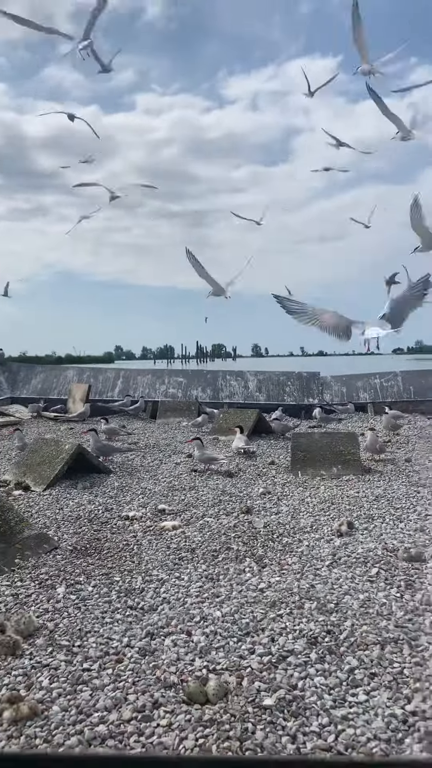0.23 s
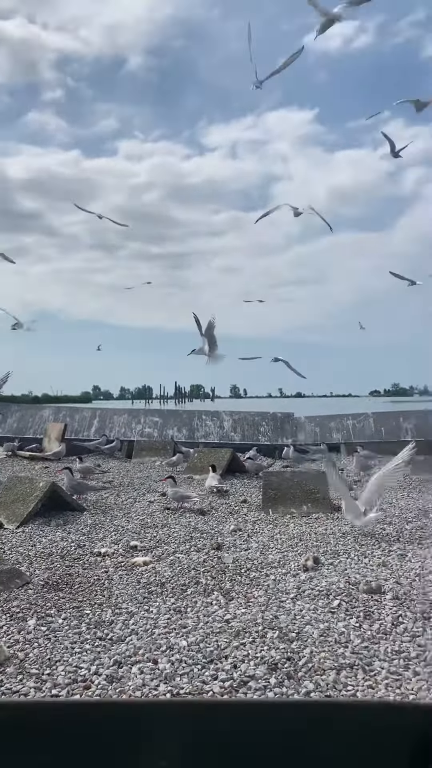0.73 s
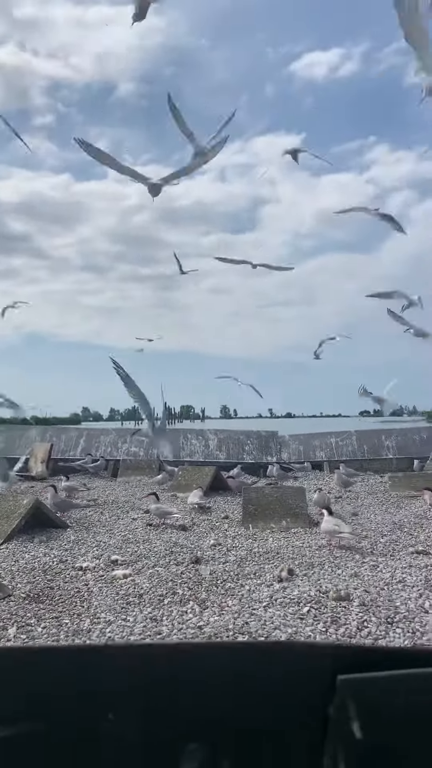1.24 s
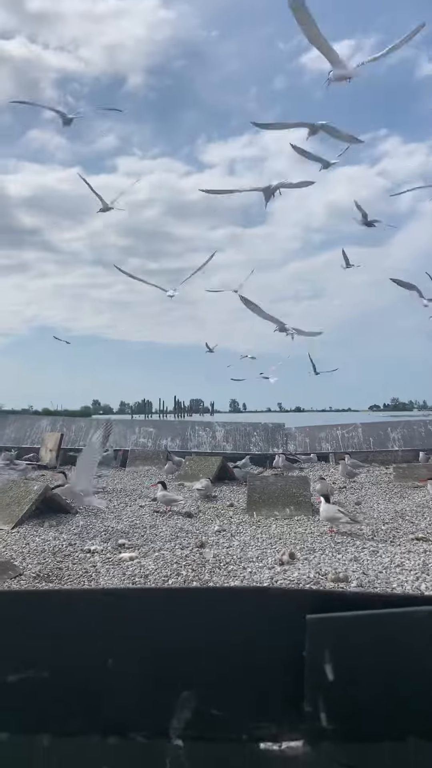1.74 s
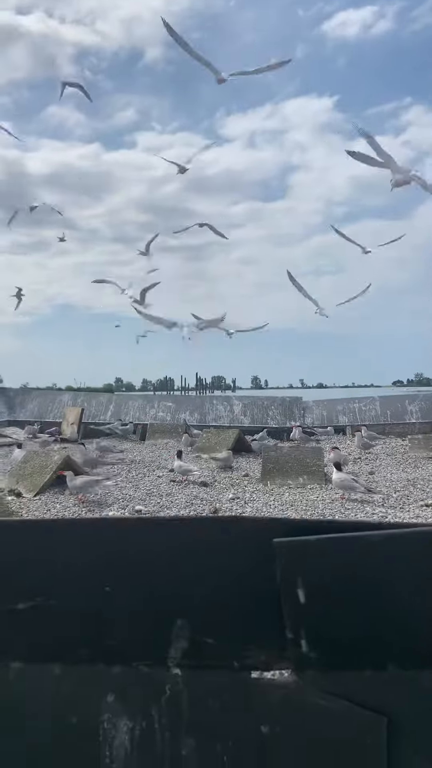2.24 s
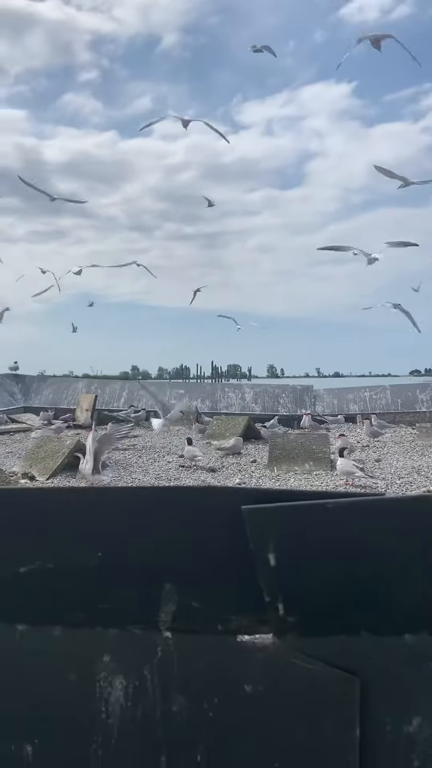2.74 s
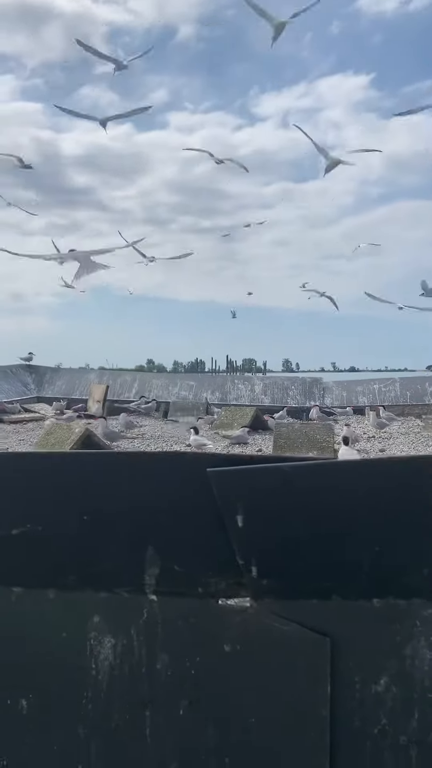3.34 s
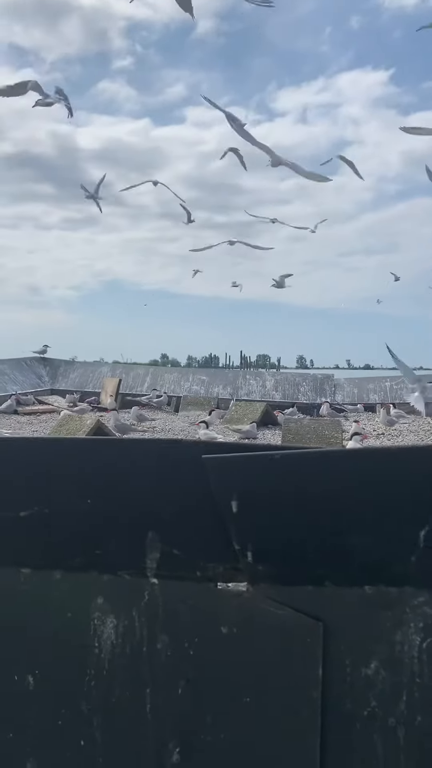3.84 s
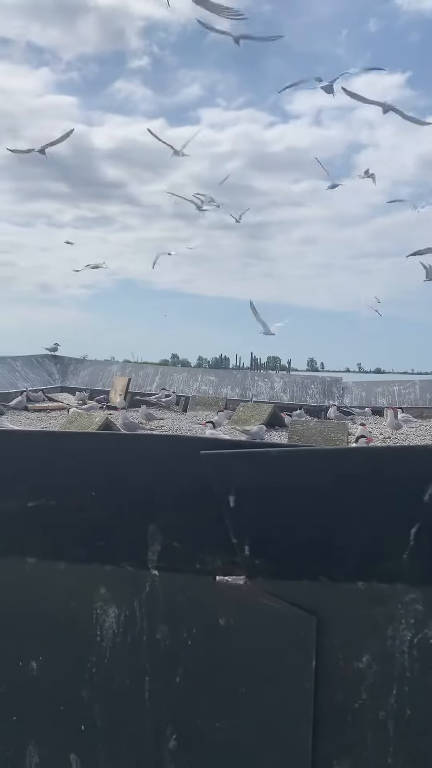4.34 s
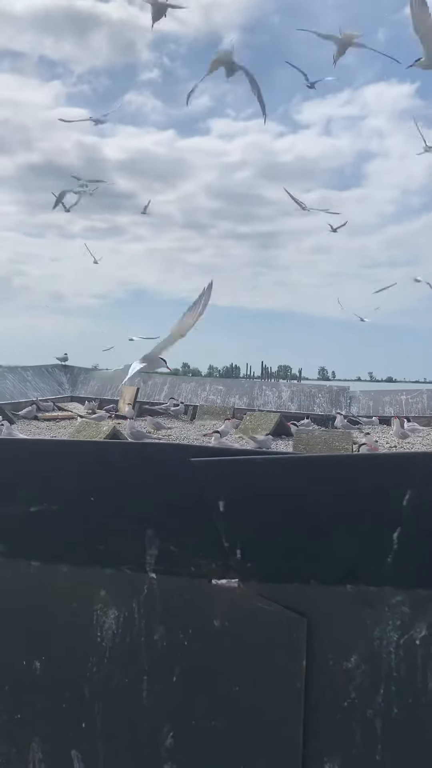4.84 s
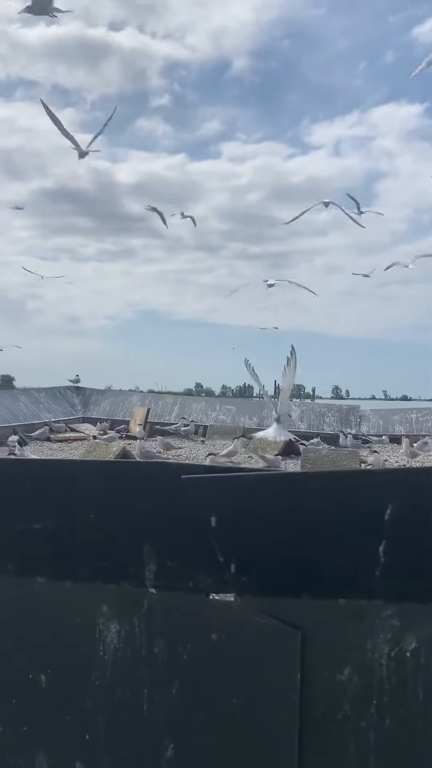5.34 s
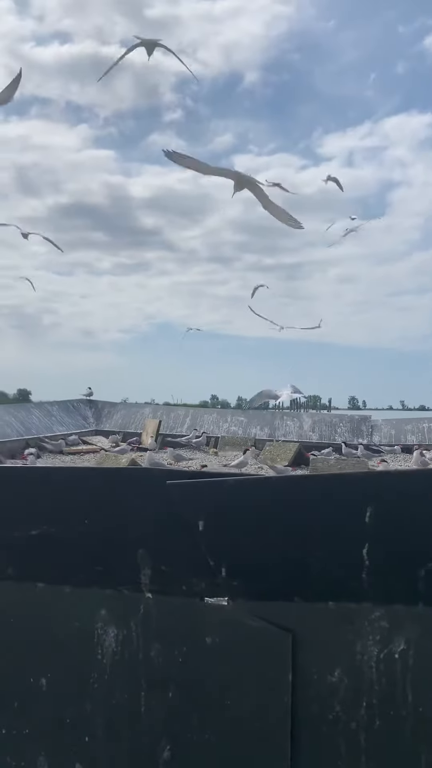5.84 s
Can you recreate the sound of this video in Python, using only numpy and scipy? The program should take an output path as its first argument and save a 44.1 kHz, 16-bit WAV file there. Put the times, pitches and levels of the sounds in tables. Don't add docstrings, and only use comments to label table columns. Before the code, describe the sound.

Outdoors at a gravel nesting island by water, many terns wheel close overhead giving sharp kips, grating screams, falling alarm slurs, hoarse barks and stuttering trills. Hundreds of farther birds merge into a bright, swelling hiss. A handheld phone in the open picks up wide stereo calls and lumpy low wind buffeting, with a hard gust around the middle and more near the end.

```python
import sys
import numpy as np
from scipy import signal
from scipy.fft import rfft, irfft, next_fast_len
from scipy.io import wavfile
from scipy.ndimage import uniform_filter1d, map_coordinates

SR = 44100
rng = np.random.default_rng(int(sys.argv[2]) if len(sys.argv) > 2 else 0)


def voltage_ratio(decibels):
    exponent = np.asarray(decibels, float) / 20
    return 10 ** exponent


def output_pcm(signal):
    pcm = np.clip(np.atleast_2d(signal).T, -1, 1) * 32767
    wavfile.write(sys.argv[1], SR, np.round(pcm).astype(np.int16))


N = 268348


def unit(x):
    return x / np.sqrt(np.mean(x ** 2) + 1e-20)


def along(points, hz):
    f, v = np.transpose(points)
    return np.interp(np.log(hz + 1), np.log(f + 1), v)


def curves(rows):
    s, *cols = np.transpose(rows)
    return [np.interp(np.arange(N) / SR, s, c) for c in cols]


def bumps(rows):
    t = np.arange(N) / SR
    return sum(voltage_ratio(db) * np.exp(-.5 * ((t - s) / width) ** 2) for s, width, db in rows)


def wobble(rate_hz, count=N):
    knots = rng.standard_normal(size=1500)
    return map_coordinates(knots, [np.arange(count) * rate_hz / SR], order=1, mode="mirror")


def arch(length_s, first_hz, middle_hz, last_hz):
    u = np.linspace(0, 1, max(int(length_s * SR), 64))
    return np.polyval(np.polyfit([0, .5, 1], [first_hz, middle_hz, last_hz], 2), u)


def filtered(x, response):
    m = next_fast_len(N + 8192)
    return irfft(rfft(x, m) * response(np.fft.rfftfreq(m, 1 / SR)), m)[..., :N]


def silence():
    return np.zeros((2, N + SR))


def add(out, s, call):
    side_db = rng.normal(0, 0.78) * np.array([[1], [-1]])
    out[:, int(s * SR):][:, :len(call)] += call * voltage_ratio(side_db)


def scream(pitch, throat, jitter, rattle_db, rattle_hz, breath, attack, bright_db=0, tire_db=0):
    count = len(pitch)
    t = np.arange(count) / SR
    phase = 2 * np.pi * np.cumsum(pitch * (1 + jitter * wobble(400.3, count))) / SR
    k = np.arange(1, 11)[:, None]
    gains_db = along(throat, k * pitch.mean()) + bright_db * np.clip(k / 2 - 2, 0, 1)
    gains = voltage_ratio(gains_db + rng.normal(0, 1.74, k.shape)) * (k * pitch.max() < SR / 2.5)
    sway_hz = rng.uniform(3.4, 15.8, k.shape)
    sway = voltage_ratio(2.4 * np.sin(2 * np.pi * (sway_hz * t + rng.uniform(0, 1, k.shape))))
    fading = voltage_ratio(-tire_db * np.clip(k - 2, 0, None) * t)
    waves = np.sin(k * phase + rng.uniform(0, 2 * np.pi, k.shape))
    tone = np.sum(gains * sway * fading * waves, 0)
    tone = tone * (1 + breath * wobble(2500, count))
    beat = np.cumsum(rattle_hz * (1 + 0.293 * wobble(30.8, count))) / SR
    rattle = voltage_ratio(rattle_db * np.sin(2 * np.pi * (beat + rng.uniform())))
    edges = np.minimum(1, t / attack) * np.minimum(1, t[::-1] / 0.015)
    return unit(tone * rattle) * edges


# (frequency [Hz], gain [dB])
THROAT_GAIN = [(900, 42), (1500, -16.5), (2100, -4), (3200, -2), (4200, 2), (5400, 4), (7200, -21.5),
               (9000, -7.5), (12000, -19), (16000, -21)]
# (start [s], length [s], top pitch [Hz], level [dB], brightness [dB])
HOOKED_KIPS = [(0, 0.041, 1613, -19, -1), (0.08, 0.03, 2040, -63, -17), (0.59, 0.021, 2050, -35, -8),
               (0.692, 0.071, 1780, -25.5, 2), (0.73, 0.048, 1574, -25, 2), (1.119, 0.041, 1740, -26, 8),
               (1.168, 0.063, 1970, -36, 21), (1.332, 0.048, 1823, -28.5, 15), (1.382, 0.048, 1766, -23, 2),
               (1.608, 0.059, 1838, -24, 10), (1.719, 0.087, 1774, -33, 14),
               (1.783, 0.047, 1850, -35.5, 26), (1.86, 0.036, 1850, -30, -26),
               (1.909, 0.051, 1830, -27, -4), (2.012, 0.063, 1753, -29, 1),
               (2.141, 0.059, 1794, -26.5, 4.5), (2.292, 0.057, 1918, -36, 30),
               (2.93, 0.027, 1880, -66, -5), (3.042, 0.06, 1750, -30.5, 12),
               (3.406, 0.052, 1830, -35.5, 20), (3.982, 0.04, 1586, -27, -11),
               (4.461, 0.028, 2054, -29, -8), (4.431, 0.036, 1846, -23, 3), (4.695, 0.084, 1850, -33, 19),
               (5.185, 0.021, 1750, -16.5, -12), (5.745, 0.032, 1910, -31.5, -6),
               (5.856, 0.067, 1910, -39, -27), (5.883, 0.028, 1537, -23.5, -4),
               (5.911, 0.04, 1560, -23.5, 0), (5.948, 0.033, 1585, -19, -1)]
KIP_RISE, KIP_DROP, FLAT_DROP = .05, .13, .07


def kips():
    out = silence()
    for s, length_s, hz, db, bright_db in HOOKED_KIPS:
        u = np.linspace(0, 1, int(length_s * SR))
        pitch = hz * (1 - KIP_RISE * np.clip(1 - 2.5 * u, 0, 1) ** 2 - KIP_DROP * u ** 3.5)
        call = scream(pitch, THROAT_GAIN, jitter=.005, rattle_db=-2, rattle_hz=80, breath=.35,
                      attack=.003, bright_db=bright_db)
        add(out, s, voltage_ratio(db) * call)
    return out[:, :N]


# (frequency [Hz], gain [dB])
NARROW_BILL_GAIN = [(900, -24), (1900, -13), (3800, -11), (5600, 0), (7500, -13), (11000, -9), (16000, -22)]
# (frequency [Hz], gain [dB])
OPEN_BILL_GAIN = [(900, -22), (1900, -10), (2700, 0), (4000, 0), (5700, -7), (7600, -13), (10500, -13),
                  (16000, -28)]
# (start [s], length [s], top pitch [Hz], level [dB])
PIERCING_KIPS = [
    (.665, .035, 1935, -30),
    (1.41, 0.077, 1830, -26),
    (3.958, 0.036, 1850, -20.5),
    (4.382, 0.079, 2050, -29),
    (5.345, 0.031, 1880, -36),
    (1.865, 0.04, 1850, -37),
    (1.905, 0.051, 1806, -34),
]
# (start [s], length [s], top pitch [Hz], level [dB])
FULL_KIPS = [
    (4.412, 0.029, 2200, -32),
    (6.7, 0.024, 1400, -19),
    (4.845, 0.048, 1300, -28),
    (5.713, 0.0425, 1884, -19.5),
    (3.1, .018, 1620, -29),
]


def close_kips():
    out = silence()
    for rows, bill in (PIERCING_KIPS, NARROW_BILL_GAIN), (FULL_KIPS, OPEN_BILL_GAIN):
        for s, length_s, hz, db in rows:
            u = np.linspace(0, 1, int(length_s * SR))
            pitch = hz * (1 - KIP_RISE * np.clip(1 - 3 * u, 0, 1) ** 2 - FLAT_DROP * u ** 4)
            call = scream(pitch, bill, jitter=.004, rattle_db=1.5, rattle_hz=60, breath=.25, attack=.003)
            add(out, s, voltage_ratio(db) * call)
    return out[:, :N]


# (frequency [Hz], gain [dB])
CHEST_GAIN = [(900, -18), (1500, -13), (2100, -10), (3200, 0), (4600, -2), (5500, -5), (6400, -9),
              (7500, -18), (12000, -25), (16000, -36)]


def chest_call(pitch):
    clear = np.clip((pitch[len(pitch) // 2] - 1700) / 250, 0, 1)
    long = min(len(pitch) / SR / .15, 1) * (1 - .8 * clear)
    call = scream(pitch, CHEST_GAIN, jitter=.004 + .0081 * long, rattle_db=1 + 3.7 * long, rattle_hz=61.7,
                  breath=.35 - .17 * clear, attack=.006, tire_db=5)
    return voltage_ratio(2.5 * clear) * call


# (start [s], length [s], pitch [Hz], level [dB])
LONG_SCREAMS = [(0.179, 0.15, 1654, -29), (0.318, 0.065, 1550, -28), (1.465, 0.25, 1397, -29),
                (1.502, 0.069, 1690, -35), (1.542, 0.17, 1877, -39), (0.795, 0.17, 1726, -38),
                (0.862, 0.15, 1332, -36), (1.976, 0.12, 1672, -30.5), (2.414, 0.12, 1614, -27),
                (2.47, 0.1, 1387, -26.5), (2.513, 0.19, 1623, -30.5), (0.506, 0.057, 1000, -40),
                (2.295, 0.19, 1350, -37.5), (3.796, 0.11, 1407, -28.5), (3.904, 0.13, 1456, -31),
                (4.015, 0.24, 1509, -31.5), (4.882, 0.18, 1533, -29.5), (5.444, 0.078, 1480, -31.5),
                (5.472, 0.12, 1748, -33), (4.458, 0.25, 1440, -39), (6.009, 0.058, 1673, -39)]
# (start [s], pitch [Hz], level [dB])
SHORT_YELPS = [(0.67, 1663, -36), (0.747, 1562, -28), (0.772, 1890, -28.5), (1.476, 1650, -31),
               (1.642, 1452, -26.5), (1.734, 1596, -30), (2.026, 1560, -31), (2.059, 1725, -35.5),
               (2.138, 1676, -39), (2.295, 1524, -42), (2.386, 1593, -30), (3.566, 1660, -46),
               (4.142, 1735, -33), (4.277, 1560, -28), (4.394, 1540, -25.5), (4.459, 1582, -31),
               (4.473, 1544, -34), (4.785, 2070, -37.5), (5.047, 1466, -29), (5.609, 1850, -50),
               (5.609, 1530, -27), (6.013, 1515, -29)]
YELP_S, START_SHARE, END_SHARE = .058, .99, .98


def screams():
    out = silence()
    yelps = [(s, YELP_S, hz, db) for s, hz, db in SHORT_YELPS]
    for s, length_s, hz, db in LONG_SCREAMS + yelps:
        pitch = arch(length_s, START_SHARE * hz, hz, END_SHARE * hz)
        add(out, s, voltage_ratio(db) * chest_call(pitch))
    return out[:, :N]


# (start [s], length [s], pitch [Hz], level [dB])
HOARSE_BARKS = [(0.323, 0.076, 1518, -20.5), (0.478, 0.033, 1527, -25.5), (0.59, 0.017, 1558, -54),
                (2.011, 0.11, 1397, -33), (2.784, 0.056, 1343, -45), (3.502, 0.012, 1560, -34),
                (4.271, 0.017, 1545, -27), (4.83, 0.034, 1594, -23), (5.193, 0.041, 1663, -23.5),
                (5.562, 0.038, 1615, -25.5), (5.742, 0.04, 1390, -25.5), (5.963, 0.053, 1398, -26.5)]


def barks():
    out = silence()
    for s, length_s, hz, db in HOARSE_BARKS:
        pitch = arch(length_s, 1.05 * hz, hz, .88 * hz)
        call = scream(pitch, THROAT_GAIN, jitter=.07, rattle_db=2.5, rattle_hz=130, breath=.7,
                      attack=.005, bright_db=-2)
        add(out, s, voltage_ratio(db) * call)
    return out[:, :N]


# (frequency [Hz], gain [dB])
BILL_GAIN = [(900, -24), (1900, -19), (2700, -2), (4000, 0), (5700, -14), (7600, -19), (10500, -18),
             (16000, -30)]
# (start [s], held [s], high pitch [Hz], low pitch [Hz], level [dB])
ALARM_SLURS = [
    (.383, .092, 1975, 1690, -26),
    (.735, .11, 1740, 1560, -33),
    (1.216, .115, 2060, 1800, -23),
    (1.405, .06, 1955, 1700, -23.5),
    (4.425, .025, 1960, 1560, -27),
    (4.7, .12, 1845, 1540, -26.5),
    (5.17, .045, 1770, 1640, -28),
]
# (start [s], held [s], high pitch [Hz], low pitch [Hz], level [dB])
WIDE_SLURS = [
    (1.465, .11, 1780, 1620, -29),
    (2.682, .097, 1905, 1335, -20),
]
SAG_SHARE, SLIDE_S, ROUGH_S, PUSH_DB = .4, .005, .06, 4


def slurs():
    out = silence()
    voices = (ALARM_SLURS, BILL_GAIN, 3, 25), (WIDE_SLURS, OPEN_BILL_GAIN, 1.3, 35)
    for rows, bill, sag_power, tire_db in voices:
        for s, held_s, high_hz, low_hz, db in rows:
            count = int((held_s + ROUGH_S) * SR)
            t = np.arange(count) / SR
            slid = 1 / (1 + np.exp((held_s - t) / SLIDE_S))
            fallen = SAG_SHARE * (t / held_s) ** sag_power * (1 - slid) + slid
            pitch = (high_hz - (high_hz - low_hz) * fallen) * (1 + .009 * wobble(70, count))
            pitch = pitch * (1 + .04 * slid * wobble(700, count))
            push_db = PUSH_DB * np.exp(-((t - held_s + .014) / .02) ** 2)
            push_db = push_db - 6 * slid + 2 * wobble(60, count)
            call = scream(pitch, bill, jitter=.005, rattle_db=2.5, rattle_hz=50, breath=.32,
                          attack=.005, tire_db=tire_db)
            add(out, s, voltage_ratio(db + push_db) * call)
    return out[:, :N]


# (time [s], pitch [Hz])
WHOOP_PITCH = [
    (.75, 1590),
    (.8, 1710),
    (.83, 1810),
    (.855, 1945),
    (.875, 1990),
    (.895, 1940),
    (.912, 1800),
]


def whoop():
    out = silence()
    start_s, end_s = WHOOP_PITCH[0][0], WHOOP_PITCH[-1][0]
    climb = curves(WHOOP_PITCH)[0][int(start_s * SR):int(end_s * SR)]
    call = scream(uniform_filter1d(climb, size=600), BILL_GAIN, jitter=.003, rattle_db=2.5, rattle_hz=45,
                  breath=.3, attack=.02, bright_db=10)
    add(out, start_s, voltage_ratio(-28) * call)
    return out[:, :N]


# (start [s], length [s], first pitch [Hz], last pitch [Hz], level [dB])
THIN_CRIES = [(.5, 0.12, 1735, 1655, -33), (0.204, 0.12, 1630, 1600, -32), (0.684, 0.089, 1696, 1630, -32),
              (1.469, 0.19, 1690, 1597, -28.5), (2.167, .12, 1780, 1610, -41),
              (2.002, 0.13, 1650, 1670, -34.5), (2.314, 0.1, 1504, 1450, -36),
              (3.302, 0.11, 1654, 1527, -31), (3.693, 0.093, 1700, 1656, -31),
              (4.459, 0.083, 1616, 1384, -32), (4.859, 0.24, 1664, 1532, -30),
              (5.782, .09, 1520, 1490, -37.5)]


def cries():
    out = silence()
    for s, length_s, first_hz, last_hz, db in THIN_CRIES:
        pitch = np.linspace(first_hz, last_hz, int(length_s * SR))
        call = scream(pitch, BILL_GAIN, jitter=.005, rattle_db=3, rattle_hz=56, breath=.22, attack=.012)
        add(out, s, voltage_ratio(db) * call)
    return out[:, :N]


# (first burst [s], length [s], pitch [Hz], burst rate [1/s], level [dB])
TRILL_CALLS = [
    (0.863, 0.39, 1567, 60, -31.5),
    (2.866, 0.49, 1548, 43, -36.5),
    (3.192, 0.26, 1500, 50, -30.5),
    (3.422, 0.17, 1614, 56.5, -29),
    (3.5614, 0.23, 1649, 61, -30),
    (3.733, 0.051, 1690, 67, -21.5),
    (4.896, 0.27, 1541, 49, -30),
    (5.266, 0.25, 1484, 57, -32),
    (5.6, 0.093, 1535, 44, -32),
    (5.791, 0.12, 1503, 50, -66),
]
BURST_DB, SWELL_S = 5, .072


def trills():
    out = silence()
    for s, length_s, hz, rate_hz, db in TRILL_CALLS:
        pitch = arch(length_s, START_SHARE * hz, hz, END_SHARE * hz)
        t = np.arange(len(pitch)) / SR
        burst_db = BURST_DB * np.cos(2 * np.pi * rate_hz * t) + 2.2 * wobble(27.3, len(t))
        swell = np.minimum(1, 0.31 + np.minimum(t, t[::-1]) / SWELL_S)
        call = scream(pitch, CHEST_GAIN, jitter=.016, rattle_db=-5, rattle_hz=59.4, breath=.45, attack=.0047)
        add(out, s, voltage_ratio(db) * unit(voltage_ratio(burst_db)) * swell * call)
    return out[:, :N]


# (frequency [Hz], gain [dB])
GULLET_GAIN = [(1000, 1), (2200, 2), (3300, 4), (4400, -1), (6600, -7), (11000, -21)]
# (start [s], length [s], pitch [Hz], level [dB])
DEEP_CROAKS = [(0.267, 0.071, 1195, -36), (0.422, 0.17, 1129, -35), (0.885, 0.085, 1182, -43),
               (1.707, 0.055, 1065, -33), (1.802, 0.039, 1197, -37.5), (3.795, 0.13, 1126, -36.5),
               (4.208, 0.2, 1135, -38), (5.198, 0.24, 1096, -41.5), (2.195, 0.11, 1060, -61),
               (2.292, 0.1, 1248, -40), (3.417, 0.18, 1114, -48.5)]


def deep_birds():
    out = silence()
    for s, length_s, hz, db in DEEP_CROAKS:
        pitch = arch(length_s, hz, hz, END_SHARE * hz)
        call = scream(pitch, GULLET_GAIN, jitter=.01, rattle_db=5.5, rattle_hz=63.9, breath=.13, attack=.0028)
        add(out, s, voltage_ratio(db) * call)
    return out[:, :N]


# (frequency [Hz], likeness [0-1])
PORT_LIKENESS = [(100, .96), (250, .8), (600, .45), (1000, .65), (2500, .72), (4500, .9), (16000, .87)]


def spread(pair, spectrum):
    def response(hz):
        turn = np.arccos(np.clip(along(PORT_LIKENESS, hz), 0, 1)) / 2
        return voltage_ratio(along(spectrum, hz)) * np.array([np.cos(turn), np.sin(turn)])
    mid, side = filtered(pair, response)
    return unit(np.array([mid + side, mid - side]))


# (pitch [Hz], spread [Hz], share)
CALLER_KINDS = [
    (1131.5, 60, .2),
    (1560, 110, .5),
    (1850, 150, 0.28),
]
# (frequency [Hz], gain [dB])
FAR_GAIN = [(700, -35), (950, -15), (1200, -10), (2000, -10.5), (3200, 2), (4200, -6.5), (5400, -9.5),
            (7200, -22.5), (9000, -16), (12000, -24.5), (15000, -25.5), (17000, -53)]
# (time [s], level [dB])
CLAMOUR_LEVEL = [(0.0, -30.5), (0.37, -30.5), (0.86, -26.5), (1.17, -34.5), (1.61, -29), (2.08, -37),
                 (2.5, -31.5), (2.9, -36), (3.25, -33.5), (3.6, -32), (4.18, -33.5), (4.33, -28.5),
                 (4.6, -33.5), (4.92, -30), (5.38, -29.5), (5.64, -34), (5.84, -33), (6.08, -29.5)]
HISS_DB, HISS_STAYS, HISS_FADES_DB_PER_S = 5, .67, .5


def colony(count=560):
    out = np.zeros((2, N + 2 * SR))
    kinds = np.array(CALLER_KINDS)
    shares = np.cumsum(kinds[:, 2]) / kinds[:, 2].sum()
    for s, size, pick, off, bend, loud, side in rng.uniform(0, 1, (count, 7)):
        hz, width_hz, _ = kinds[min(np.searchsorted(shares, pick), 2)]
        hz = hz + width_hz * (4 * off - 2)
        pitch = arch(.035 + .15 * size ** 3, .97 * hz, hz, hz * (1.02 - .16 * bend ** 2))
        call = scream(pitch, [(1, 0)], jitter=.014, rattle_db=4.5, rattle_hz=62, breath=.55, attack=.0076)
        out[int(2 * side), int(s * (N + SR // 4)):][:len(call)] += voltage_ratio(-6 * loud) * call
    calls = out[:, SR // 4:][:, :N]
    crowd = uniform_filter1d(np.mean(calls ** 2, 0), size=SR // 10)
    calls = unit(calls / np.sqrt(abs(crowd) + 1e-9))
    far = spread(calls + voltage_ratio(-5) * rng.standard_normal((2, N)), FAR_GAIN)
    crowd = uniform_filter1d(np.mean(far ** 2, 0), size=SR // 8)
    far = unit(far / np.sqrt(abs(crowd) + 1e-9))
    level_db, = curves(CLAMOUR_LEVEL)
    hiss_db = HISS_DB - HISS_STAYS * (level_db - level_db.mean()) - HISS_FADES_DB_PER_S * np.arange(N) / SR
    high = filtered(far, lambda hz: 1 / (1 + (6500 / (hz + 1)) ** 4))
    return voltage_ratio(level_db + 4.5) * (far - high + voltage_ratio(hiss_db) * high)


# (frequency [Hz], density [dB per Hz])
RUMBLE_GAIN = [(13, -40), (22, -16), (42, 1), (64, 10), (173, -7), (200, -31), (260, -17), (440, -120)]
FLUTTER_GAIN = [(90, -2.5), (150, 1.5), (250, -7), (400, -22.5), (700, -30), (2000, -120)]
SHORE_GAIN = [(150, -38), (300, 0.5), (650, -0.5), (1000, -4), (1600, -15), (5000, -120)]
# (time [s], level [dB])
BREEZE_LEVEL = [
    (0, -43.5),
    (1.1, -46.5),
    (2.3, -45),
    (2.75, -48.5),
    (3.4, -50),
    (3.85, -44),
    (4.3, -45.5),
    (4.6, -47.5),
    (5.5, -44.5),
    (6.08, -46.5),
]
# (peak [s], width [s], level [dB])
PORT_GUSTS = [(.18, 0.066, -39), (.39, 0.05, -102), (.62, 0.073, -46.5), (.85, 0.033, -50),
              (1.05, 0.063, -39.5), (1.4, 0.011, -49), (1.65, 0.024, -35), (2.01, 0.046, -39),
              (2.24, 0.035, -39.5), (2.45, 0.015, -45), (2.56, 0.019, -27.5), (2.68, 0.023, -41.5),
              (2.98, 0.022, -52), (3.19, 0.034, -43), (4.36, 0.045, -44), (4.84, 0.011, -51),
              (5.36, 0.012, -42), (5.65, 0.018, -36), (5.71, 0.015, -35.5), (5.82, .03, -84),
              (5.97, 0.025, -34.5), (6.06, 0.019, -27)]
# (peak [s], level [dB])
AIR_SLAPS = [(1.05, -87), (1.22, -39), (1.6, -46), (2, -36), (2.25, -49), (2.542, -21), (4.352, -30.5),
             (4.38, -32.5), (5.39, -50), (5.671, -47), (6.05, -35)]
# (peak [s], level [dB])
CASE_PUFFS = [
    (0.129, -58),
    (.32, -86),
    (.97, -54),
    (1.23, -57),
    (1.85, -52),
    (2.538, -69),
    (3.62, -64),
    (4.0, -53.5),
    (5.25, -65),
    (6.03, -68),
]
SLAP_S, PUFF_S = .011, .035
FLUTTER_DB, FLUTTER_FOLLOWS, HUSH_DB, HUSH_FOLLOWS = -50, 1.5, -53.5, .26


def wind():
    def noise(spectrum):
        return spread(rng.standard_normal((2, N)), spectrum)
    breeze_db, = curves(BREEZE_LEVEL)
    swing_db = breeze_db - breeze_db.mean()
    slaps = bumps([(s, SLAP_S, db) for s, db in AIR_SLAPS])
    puffs = bumps([(s, PUFF_S, db) for s, db in CASE_PUFFS])
    rumble = unit(voltage_ratio(0.91 * wobble(11)) * noise(RUMBLE_GAIN))
    rumble = (voltage_ratio(breeze_db) + bumps(PORT_GUSTS)) * rumble
    flutter = unit(voltage_ratio(4.5 * wobble(10)) * noise(FLUTTER_GAIN))
    flutter = (voltage_ratio(FLUTTER_DB + FLUTTER_FOLLOWS * swing_db) + slaps) * flutter
    hush_db = HUSH_DB + HUSH_FOLLOWS * swing_db + 1.1 * wobble(7.5)
    shore = (voltage_ratio(hush_db) + puffs) * noise(SHORE_GAIN)
    return rumble + flutter + shore * voltage_ratio([[-1.5], [1.5]])


def scene():
    calls = kips() + close_kips() + screams() + barks() + slurs() + whoop() + cries() + trills() + deep_birds()
    return calls + colony() + wind()


# (frequency [Hz], lag [rad])
PORT_LAG = [(0, 0), (1000, .3), (3600, 1.55), (4780, 3.14), (6900, 6.28), (8950, 9.42), (16000, 19.84)]


def lagged(dry):
    def lag(hz):
        return np.exp(.5j * np.interp(hz, *np.transpose(PORT_LAG)) * np.array([[1], [-1]]))
    return filtered(dry, lag)


def band_limit(x):
    return signal.sosfilt(signal.butter(12, 17080, fs=SR, output="sos"), x)


def record(dry):
    ports = lagged(dry)
    return band_limit(ports)


dry = scene()
out = record(dry)
output_pcm(out)
```